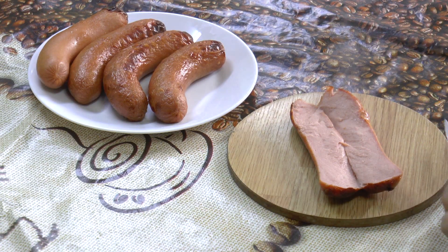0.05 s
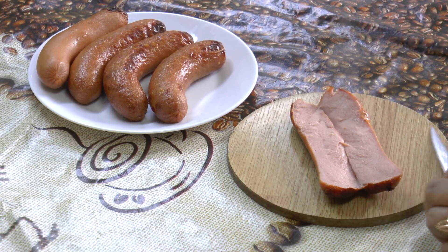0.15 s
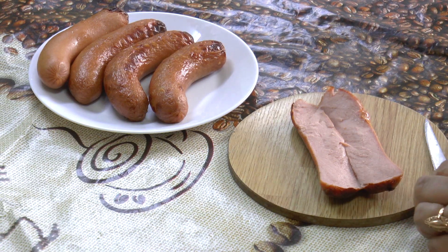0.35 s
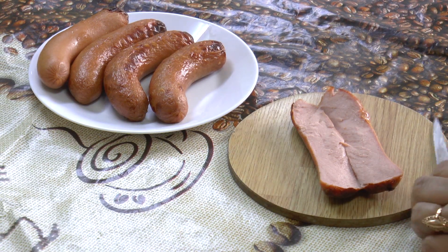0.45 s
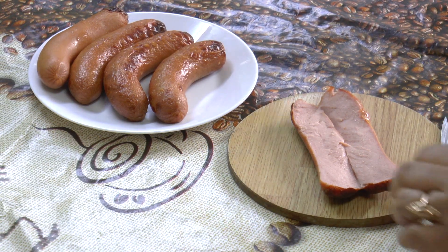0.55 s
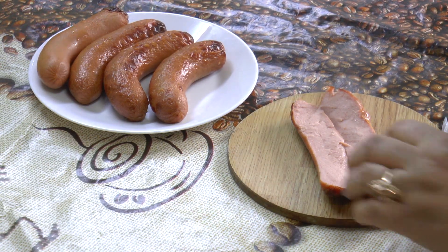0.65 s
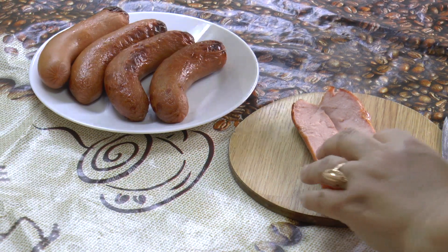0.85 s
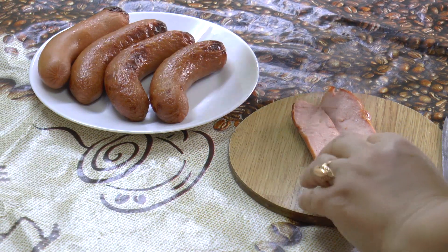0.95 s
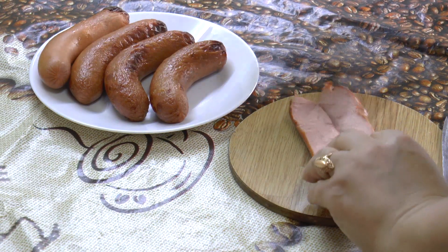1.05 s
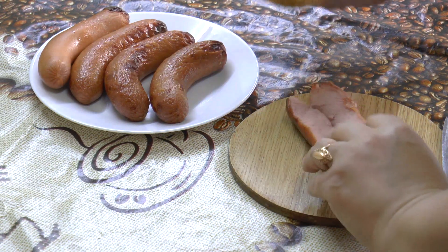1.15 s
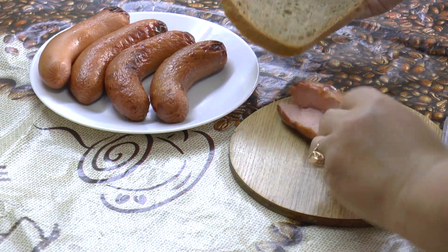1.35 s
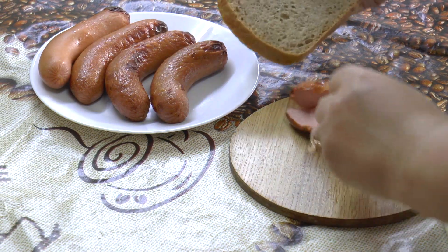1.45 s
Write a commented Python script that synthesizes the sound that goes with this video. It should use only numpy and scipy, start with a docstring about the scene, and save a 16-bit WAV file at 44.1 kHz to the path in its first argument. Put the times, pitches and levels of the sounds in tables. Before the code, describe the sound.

A knife is laid down with a quick double knock, first the handle on a cloth-covered table, then the blade on a wooden board. Light ticks come before and soft rubbing after, close by in a small, quiet room.

```python
"""Putting down a table knife

A knife is laid beside a round wooden board on a cloth-covered table in a small kitchen.
The handle knocks first and the table thumps; then the blade clacks against the board and rings.
Each hit is a shaped click with echoes; thuds and ringing are tones that die away.
Around them are small ticks, soft rubs of a hand, and the hiss and hum of the room."""
import sys
import numpy as np
from scipy import signal
from scipy.fft import rfft, irfft
from scipy.io import wavfile
from scipy.ndimage import uniform_filter1d

SR = 44100
rng = np.random.default_rng(int(sys.argv[2]) if len(sys.argv) > 2 else 0)


def unload_audio(sound):
    """Save the sound as a 16-bit wav file, at the path given as the first command line argument."""
    columns = np.transpose(np.atleast_2d(sound))
    # keep every value between -1 and 1, then stretch to whole-number steps
    steps = np.round(np.clip(columns, -1, 1) * 32767)
    wavfile.write(sys.argv[1], SR, steps.astype(np.int16))


N = 66150
T, FREQS = np.arange(N) / SR, np.fft.rfftfreq(N, 1 / SR)


def amp(db):
    """Turns decibels into a number to multiply by."""
    return 10 ** (np.asarray(db) / 20)


def unit(x):
    """Scales a signal to an average (rms) level of 1."""
    return x / np.sqrt(np.mean(x ** 2) + 1e-20)


def curve(points, hz=FREQS):
    """Joins a table's points into a curve along the pitch scale."""
    point_hz, value = np.transpose(points)
    return np.interp(np.log(hz + 1), np.log(point_hz + 1), value)


def colour(x, db):
    """Turns each frequency up or down by its value in dB."""
    cepstrum = irfft(np.log(amp(db)), N)
    # Folding onto positive time keeps the filter from sounding before a hit.
    folded = cepstrum * (1 + np.sign(N / 2 - np.arange(N))) - cepstrum[0] * (T == 0)
    return irfft(rfft(x) * np.exp(rfft(folded)), N)


def stereo_noise(likeness):
    """White noise whose left and right range from unrelated (0) to the same (1)."""
    a, b = rfft(rng.standard_normal((2, N)))
    alike = np.clip(curve(likeness), -1, 1)
    mid, side = a * np.sqrt((1 + alike) / 2), b * np.sqrt((1 - alike) / 2)
    return irfft(np.array([mid + side, mid - side]), N)


def clicks(rows):
    """One sharp click for each hit."""
    return sum(amp(db) * (np.arange(N) == round(start * SR)) for start, db in rows)


def excite(x, response):
    """Lets every sample of x set off its own copy of a stereo response."""
    return signal.fftconvolve(x[None], response, axes=1)[:, :N]


def ring(tones, start, rise_s, spread=0):
    """A struck object's tones swell and fade; spread puts left and right out of step."""
    t = np.maximum(T - start, 0)
    phases = spread * rng.uniform(-0.47, 0.64, (len(tones), 1, 1)) * np.array([[1], [-1]])
    fading = sum(amp(db - 60 * t / fade_s) * np.sin(2 * np.pi * hz * t + phase)
                 for (hz, db, fade_s), phase in zip(tones, phases))
    return (1 - np.exp(-t / rise_s)) * fading


# How long the kitchen echoes. Each row: frequency in Hz, seconds to fade by 60 dB.
ROOM_FADE = [(150, 0.35), (500, 0.34), (2200, 0.26), (5000, 0.23), (12000, 0.23)]
# How alike the echo is left and right. Each row: frequency in Hz, likeness from 0 to 1.
ROOM_LIKENESS = [(100, 0.8), (400, 0.9), (700, .78), (1200, 0.7), (2200, 0.93), (4200, 0.91), (6800, 1),
                 (13000, 0.3)]

def room(x, wet_db):
    """The kitchen's blurred echo, with the lows lasting longest."""
    hz, t, bands = signal.stft(stereo_noise(ROOM_LIKENESS), SR, nperseg=256)
    fade = amp(-60 * t / curve(ROOM_FADE, hz)[:, None])
    tail = signal.istft(bands * fade, SR, nperseg=256)[1][:, :N]
    tail *= 1 - np.exp(-T / 0.0059)  # builds up in about 6 ms
    return amp(wet_db) * excite(x, tail / np.linalg.norm(tail[0]))


# Bounces off nearby surfaces. Each row: delay in seconds, left gain, right gain.
BOUNCES = [(.0028, .45, .35), (.0032, 0.44, .3), (.0036, 0.13, 0.29), (.0072, .15, .2), (.0125, .2, .15),
           (0.021, .2, .2)]

def with_bounces(x, echo_db, dull_hz=3500):
    """The direct sound plus duller copies from table, plate and wall."""
    dull = signal.lfilter(*signal.butter(1, dull_hz, fs=SR), x)
    echoes = sum(np.outer([left, right], np.interp(T - delay, T, dull, left=0))
                 for delay, left, right in BOUNCES)
    return x + amp(echo_db) * echoes


# How alike the buzz is left and right. Each row: frequency in Hz, likeness from 0 to 1.
CHATTER_LIKENESS = [(100, 0.85), (700, 1), (2200, 0.8), (4200, 0.9), (7000, 0.87), (13000, 0.6)]

def chatter(x, db, fade_s):
    """A brief buzz of tiny contacts after each hit."""
    burst = stereo_noise(CHATTER_LIKENESS) * np.exp(-T / fade_s)
    return amp(db) * excite(x, burst / np.linalg.norm(burst[0]))


# The tone of the hiss and of the rush. Each row: frequency in Hz, relative level in dB.
HISS_COLOUR = [(20, -25), (45, -2.5), (80, 0.5), (150, -1), (200, 0), (260, -4), (350, 1.5), (500, -8),
               (570, -7.5), (780, -14), (1000, -15.5), (1400, -13.5), (1800, -10), (2300, -14),
               (3300, -15.5), (4400, -16.5), (5300, -25), (7000, -21.5), (10000, -20), (16000, -22)]
RUSH_COLOUR = [(40, -17.5), (130, -7.5), (240, 2), (380, -2), (500, -7), (560, -5.5), (650, -12.5),
               (780, -3), (950, -27.5), (1400, -9), (1680, -14.5), (1790, -2), (1920, -9.5), (2300, -12.5),
               (3150, -8), (4000, -11), (7000, -18), (10000, -21.5), (15000, -28.5)]
# How alike each is left and right. Each row: frequency in Hz, likeness from 0 to 1.
HISS_LIKENESS = [(40, 0.45), (100, 0.24), (230, 0.063), (700, 0.2), (1300, 0.68), (2300, 0.76), (4300, 1),
                 (7000, 0.9), (13000, 0.081)]
RUSH_LIKENESS = [(100, 0.78), (300, .85), (1200, 0.91), (2300, 0.94), (4500, 1), (7000, 1), (13000, 0.3)]
# How loud the rush is. Each row: time in seconds, level in dB.
RUSH_LOUDNESS = [(0, -54), (.08, -53.5), (.17, -53), (.28, -53), (.35, -56.5), (.45, -53), (.68, -62),
                 (.8, -62), (.95, -62), (1.1, -62), (1.22, -69), (1.5, -61)]
# An appliance's hum and whine. Each row: frequency in Hz, level in dB.
HUM_TONES = [(60, -75.5), (1775, -78), (1825, -87), (3125, -82.5)]

def background():
    """Steady hiss, a rushing noise that sinks after the knocks, and a faint appliance hum."""
    hiss = amp(-64.5) * unit(colour(stereo_noise(HISS_LIKENESS), curve(HISS_COLOUR)))
    rush_level = amp(np.interp(T, *np.transpose(RUSH_LOUDNESS)))
    rush = rush_level * unit(colour(stereo_noise(RUSH_LIKENESS), curve(RUSH_COLOUR)))
    hum = sum(amp(db) * np.sqrt(2) * np.sin(2 * np.pi * (hz * T + rng.random()))
              for hz, db in HUM_TONES)
    return hiss + rush + hum


# Soft rubs. Each row: start, rise and fade in seconds, level in dB, centre in Hz, width in octaves.
RUB_STROKES = [(0.198, 0.0064, 0.056, -53.5, 2360, 0.69), (.201, .003, 0.049, -54.5, 6500, 0.47),
               (.88, 0.2, 0.12, -65, 2700, 0.93), (1.071, 0.026, 0.11, -69.5, 8050, 0.65),
               (1.408, 0.019, 0.27, -58, 2310, 0.85), (1.43, 0.048, 0.04, -58, 7060, 0.49),
               (1.461, 0.0092, 0.017, -55, 2010, 0.45)]

def rubs():
    """Hand and food slide over cloth and board, making soft, grainy noise."""
    out = np.zeros((2, N))
    for start, rise, fade, db, hz, octaves in RUB_STROKES:
        band_db = -4.3 * (np.log2((FREQS + 1) / hz) / octaves) ** 2
        grain = amp(2.5 * unit(uniform_filter1d(rng.standard_normal(N), size=90)))
        noise = colour(stereo_noise(RUSH_LIKENESS), np.maximum(band_db, -40))
        swell = np.clip((T - start) / rise, 0, 1)
        decay = np.exp(-np.maximum(T - start - rise, 0) / fade)
        out += amp(db) * swell * decay * unit(grain * noise)
    return out


# Small ticks. Each row: start in seconds, relative level in dB.
TICK_HITS = [(0.0283, -24), (0.0474, -8.5), (0.057, -19), (0.147, -18.5)]
# Their tone. Each row: frequency in Hz, relative level in dB.
TICK_TONE = [(200, -21), (2000, -16.5), (2800, -7.5), (3300, -1), (4200, -8.5), (5500, -15), (8500, -8),
             (11000, -17), (16000, -27)]

def ticks():
    """The knife ticks lightly as it moves in the hand."""
    hits = colour(clicks(TICK_HITS), curve(TICK_TONE))
    return (with_bounces(hits, echo_db=-12) + chatter(hits, db=-3.5, fade_s=0.0018)
            + room(hits, wet_db=-4))


# The board's thuds. Each row: start in seconds, relative level in dB.
BOARD_THUDS = [(.384, -55.5), (0.484, -46.5), (0.5059, -43), (0.516, -46), (0.545, -42), (.567, -47.5)]
# The board's tones. Each row: frequency in Hz, relative level in dB, seconds to fade by 60 dB.
BOARD_RING = [(146, -10.5, 0.16), (241.2, 2.5, 0.19), (390, 2.5, 0.14), (576, -13, 0.17), (820, -11, 0.097),
              (1101, -11, .13)]

def board():
    """The board rocks and settles, and each thud sets the wood ringing."""
    thuds = sum(amp(db) * ring(BOARD_RING, start, rise_s=0.0032) for start, db in BOARD_THUDS)
    return thuds + room(thuds[0], wet_db=-17.5)


# The table top's tones. Each row: frequency in Hz, relative level in dB, seconds to fade by 60 dB.
TABLE_RING = [(165.5, -20, 0.4), (255, 0.5, 0.067), (397, -10.5, 0.067), (576, -5, 0.076), (721, -4, 0.069),
              (790, -5, 0.066), (1105, -7, 0.055), (1382, -8.5, 0.069), (1655, -9, 0.061),
              (1897, -11.5, 0.093), (2153, -14, .08)]

def table(lag_s=0.00207):
    """The table top answers the handle's hardest knock with a hollow thump."""
    thump = amp(-29) * ring(TABLE_RING, HANDLE_HITS[1][0] + lag_s, rise_s=0.003)
    return thump + room(thump[0], wet_db=-25)


# The handle's knocks. Each row: start in seconds, relative level in dB.
HANDLE_HITS = [(0.439, -7.5), (0.4413, -4), (0.4553, -15.5)]
# Their tone. Each row: frequency in Hz, relative level in dB.
HANDLE_TONE = [(60, -25), (200, -2), (400, -6.5), (700, -6), (1200, -9.5), (2100, -3.5), (3000, -10.5),
               (4400, -8), (6000, -12), (9400, -15), (12500, -24.5), (16000, -26)]

def handle():
    """The handle lands with a dry crack: three quick knocks, each with a brief buzz and room echo."""
    knocks = [colour(clicks([hit]), curve(HANDLE_TONE)) for hit in HANDLE_HITS]
    return sum(amp(-2) * with_bounces(knock, echo_db=-16) + chatter(knock, db=3.5, fade_s=0.0034)
               + room(knock, wet_db=6.5) for knock in knocks)


# The blade's clacks. Each row: start in seconds, relative level in dB.
BLADE_HITS = [(0.5085, -14.5), (.5104, -10.5), (0.5174, 1), (0.5494, -27), (0.5898, -20)]
# Their tone. Each row: frequency in Hz, relative level in dB.
BLADE_TONE = [(60, -22.5), (150, -3.5), (300, -5.5), (700, -6), (1300, -7), (2200, 2.5), (3200, -0.5),
              (4400, -5.5), (6000, -10), (7000, -16), (8500, -17.5), (12500, -27.5), (16000, -37)]
# The knife's ringing tones, and the one very short tone of its flat side slapping the board.
# Each row: frequency in Hz, relative level in dB, seconds to fade by 60 dB.
KNIFE_RING = [(1410, -7, .16), (1775, -7, .26), (1915, -5, .28), (2028, 0, .32), (2120, -4, .25),
              (2175, -3, .2), (2237, -2, .28), (2422, -1, .27), (2490, -4, .25), (2783, -1, .23),
              (2880, -5, .22), (3173, -3, .27), (3297, -4, .27), (4107, -6, .2)]
SLAP_RING = [(2530, 3.8, 0.003)]

def blade(soft_hz=6500, slap_lag_s=0.0024):
    """The blade touches, then clacks and slaps against the board and rings briefly."""
    hits = clicks(BLADE_HITS)
    clacks = colour(hits, curve(BLADE_TONE))
    softened = signal.lfilter(*signal.butter(2, soft_hz, fs=SR), clacks)  # the wood gives a little
    direct = amp(-1) * with_bounces(softened, echo_db=-6.5)
    ringing = amp(-47) * excite(hits, ring(KNIFE_RING, 0, rise_s=0.0017, spread=1.2))
    hardest_at = max(BLADE_HITS, key=lambda hit: hit[1])[0]
    slap = ring(SLAP_RING, hardest_at + slap_lag_s, rise_s=0.0052)
    return direct + chatter(clacks, db=-5, fade_s=0.003) + room(clacks, wet_db=0.5) + ringing + slap


def scene():
    """Adds up everything heard at the table."""
    return handle() + table() + blade() + board() + ticks() + rubs() + background()


# Narrow bands the microphone turns down. Each row: centre in Hz, width in Hz, change in dB.
MIC_DIPS = [(202, 16, -0.5), (491.6, 20, -10), (900, 40, -4.5), (1306, 43, -8), (1551, 48, -7)]

def record(dry, top_hz=15850):
    """The microphone weakens a few narrow bands, and the highest treble is cut off."""
    dips_db = sum(db * np.exp(-((FREQS - hz) / width) ** 2) for hz, width, db in MIC_DIPS)
    treble_cut = signal.firwin(511, top_hz, window=("kaiser", 9), fs=SR)
    return signal.oaconvolve(colour(dry, dips_db), treble_cut[None], "same")


dry = scene()
out = record(dry)
unload_audio(out)
```